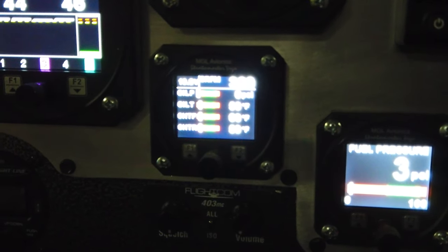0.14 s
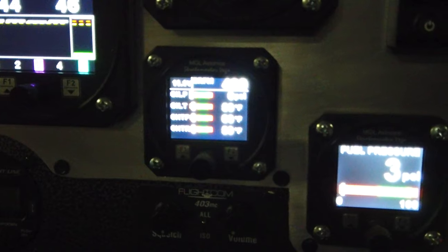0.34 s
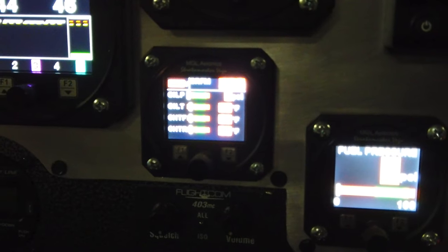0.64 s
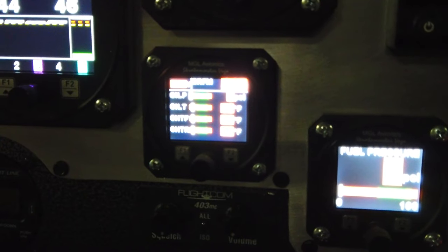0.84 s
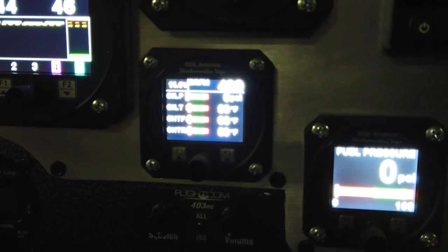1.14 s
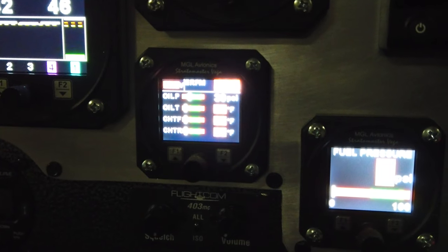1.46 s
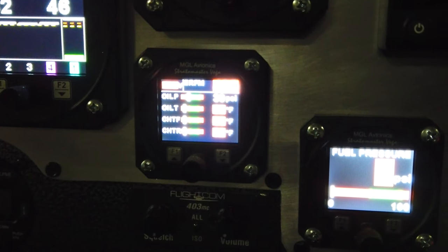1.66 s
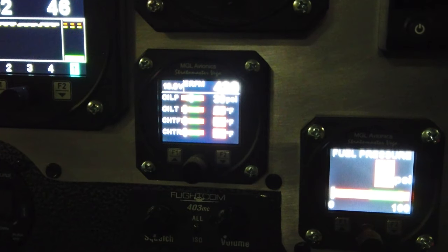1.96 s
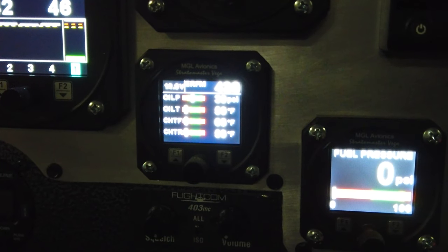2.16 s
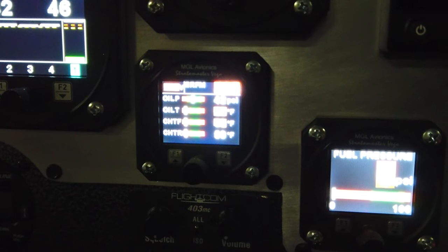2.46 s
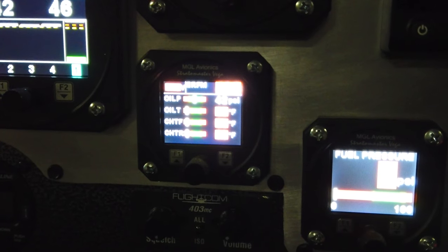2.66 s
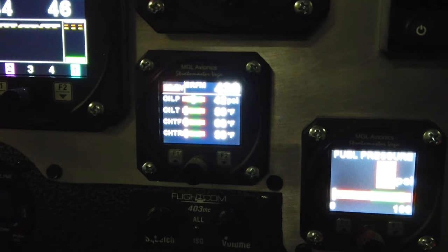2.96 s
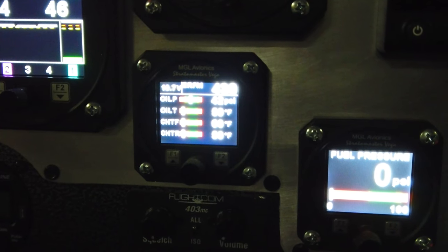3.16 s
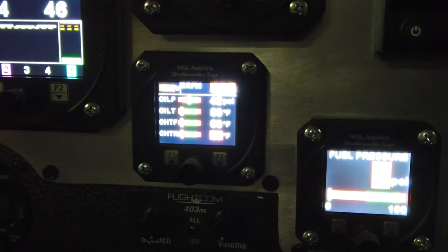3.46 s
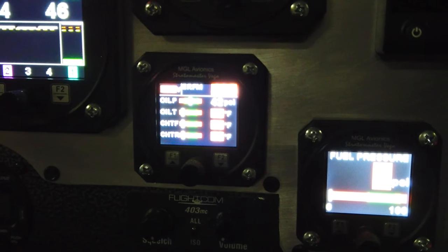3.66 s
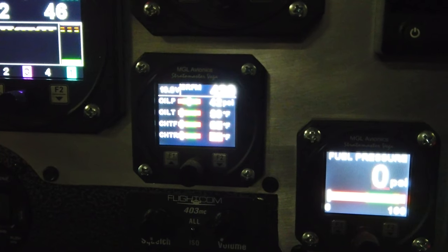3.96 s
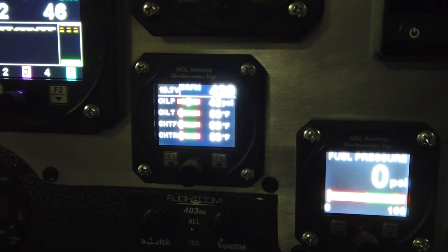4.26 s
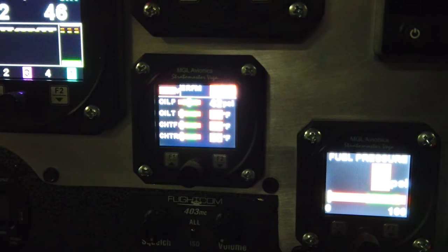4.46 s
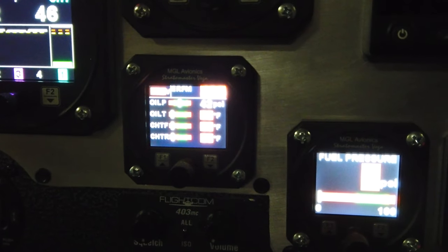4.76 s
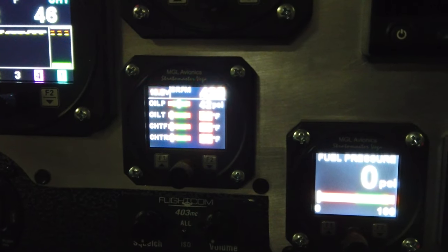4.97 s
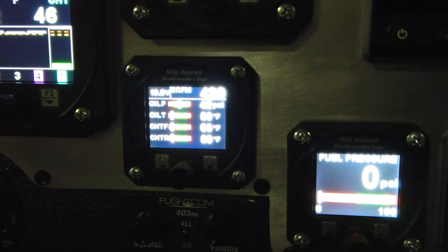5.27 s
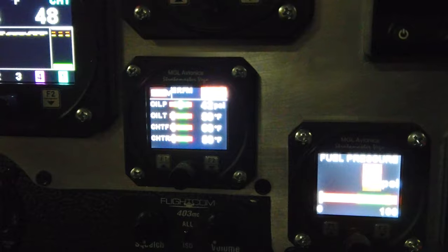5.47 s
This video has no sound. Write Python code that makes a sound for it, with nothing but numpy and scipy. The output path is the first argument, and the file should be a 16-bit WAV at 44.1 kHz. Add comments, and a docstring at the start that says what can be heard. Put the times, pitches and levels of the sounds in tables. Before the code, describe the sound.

Inside a plane's cockpit in a hangar, a starter engages with a brief scrape and cranks a piston engine that never fires. Low, even thumps come about fourteen times a second, and a high gear whine dips with each one. The gears churn, hiss and rattle over a low rumble, with occasional harder clacks. A switch clicks near the end. The sound is close, with a slight echo.

```python
"""In a plane's cockpit inside a hangar, the starter turns a piston engine that does not fire.
About 14 times a second a piston squeezes its air. Each of these strokes thumps the cabin and
slows the starter, so the whine of its gear teeth swoops. The gears scrape as they meet, then
churn, rattle and hiss under the load, over a low rumble. A switch clicks near the end."""
import sys
import numpy as np
from scipy import signal
from scipy.fft import rfft, irfft
from scipy.io import wavfile

SR = 44100
rng = np.random.default_rng(int(sys.argv[2]) if len(sys.argv) > 2 else 0)


def store_pcm(level_fs):
    """Save levels as 16-bit WAV."""
    pcm = np.round(np.clip(level_fs, -1, 1) * 32767).astype(np.int16)
    wavfile.write(sys.argv[1], SR, np.atleast_2d(pcm).T)


N = 247442
TIME, FREQ = np.arange(N) / SR, np.fft.rfftfreq(N, 1 / SR)

# The thump's tones. Each row: multiple of the stroke rate, level in dB at first, level once settled.
THUMP_TONES = [(1, -56, -56), (2, -17, -21), (3, -23, -24), (4, -21.5, -41.5), (5, -22, -25),
               (6, -37, -26.5), (7, -59, -43.5), (8, -38, -56), (9, -78, -68), (10, -55, -45),
               (11, -44, -57), (12, -47, -42.5), (13, -46, -52.5)]
# The four cylinders differ a little. Each row: change in dB of the thump, then of whine and churn.
CYLINDERS = [(-.1, .2), (-.8, .1), (.2, -.4), (.6, .2)]
# One stroke. Each row: place from 0 to 1, starter speed factor, change in dB of whine, churn and hiss.
STROKE_SHAPE = [(0, 1.055, -2, -.8, -1.4), (.12, 1.062, .8, .2, .4), (.27, 1.056, 0, .3, .7),
                (.38, 1.036, 1.2, -.5, .5), (.49, .988, 2.6, -.5, 1), (.58, .958, 3.3, .3, 0),
                (.7, .94, -2.8, .1, -.5), (.8, .88, -5.5, -.3, -.6), (.88, .9, -7.5, -1.2, -1),
                (.94, 1.035, -5, -1.5, -1.4)]
# The whine's tones, at 1, 2, 3.. times the tooth rate. Each row: level in dB, wobble in cycles.
WHINE_TONES = [(-34, 0.083), (-47.5, .08), (-52.5, 0.048), (-47.5, 0.072), (-47, 0.074), (-49.5, 0.088),
               (-61, 0.12)]
# The motor shaft's tones. Each row: fraction of the tooth rate, level in dB.
SHAFT_TONES = [(1 / 3, -55), (1 / 2, -50), (2 / 3, -45.5), (3 / 4, -53.5)]
# The colours of three noises. Each row: frequency in Hz, relative level in dB.
CHURN_COLOUR = [(60, -0.5), (140, -9.5), (250, -1), (305, -4.5), (450, -4), (750, -6), (860, -2),
                (930, -3.5), (1080, -0.5), (1200, -2), (1400, -2.5), (1720, 0.5), (1900, -4), (2550, -4),
                (2800, -7), (3200, -2.5), (3700, -11), (6000, -22.5)]
HISS_COLOUR = [(2000, -29), (3550, -0.5), (3750, -1), (4400, -7.5), (4680, -6.5), (4830, -3.5),
               (5030, -3.5), (5200, -5.5), (5500, -4), (6050, 4.5), (6600, 2), (6800, 1), (7450, 1),
               (8200, -0.5), (8700, -1), (9350, -2.5), (9950, -1.5), (10300, -2.5), (10700, -2.5),
               (11200, -8.5), (12400, -12), (13500, -9), (14150, -11.5), (14800, -12.5), (16000, -11.5)]
RUMBLE_COLOUR = [(8, -34), (16, -26), (24, -15), (45, -12), (62, -6), (75, -1.5), (86, -6), (100, -7.5),
                 (130, -19), (200, -23.5), (400, -52)]
# Where loose gears slap. Each row: place and scatter as shares of a stroke, clack in dB, tick in dB.
GEAR_SLAPS = [(.02, 0.015, -36.5, -59), (.16, .03, -35.5, -42), (.37, 0.025, -49, -34),
              (.585, .01, -38, -35.5), (.74, .04, -36, -52)]
# The hardest clacks. Each row: start in seconds, relative level in dB.
HARD_CLACKS = [(0.69, -18), (1.143, -28.5), (1.349, -28), (2.671, -32), (2.718, -22), (3.482, -17.5),
               (3.694, -23), (3.979, -19), (4.088, -15.5), (5.322, -28), (5.465, -20)]
# How the gear housing rings after a clack. Each row: pitch in Hz, width in Hz, relative level in dB.
HOUSING_BANDS = [(784, 120, -2.5), (1068, 137, 2.5), (1020, 970, -3)]
# The switch's snap. Each row: pitch in Hz, width in Hz, level in dB, seconds to fade by 60 dB.
SWITCH_BANDS = [(2250, 700, -29, .12), (10200, 1400, -24.5, 0.074), (12500, 1600, -29, 0.081)]
# How the cabin, engine cover and gear housing ring. Each row: pitch in Hz, width in Hz, boost in dB.
PANEL_RINGS = [(165, 30, 4.5), (240, 15, 4), (270, 15, 5), (339, 18, 7), (372, 18, 5), (430, 14, 5),
               (569, 25, 10), (684, 18, 8), (794, 24, 8), (860, 50, 3), (1043, 40, 7), (1326, 24, 7),
               (1499, 26, 6), (1545, 25, 1.5), (1615, 40, 3), (1664, 20, 4), (1695, 20, 6), (2095, 28, 6.5),
               (2180, 18, 6), (2440, 40, 4), (2560, 30, 4), (3020, 110, 4), (3260, 100, 5), (4910, 200, 7),
               (6280, 150, 3), (6635, 50, 7), (7480, 200, 4), (8250, 150, 2), (9650, 250, 3), (9930, 80, 3),
               (14180, 150, 4)]
# The echo of the cabin, then the hangar. Each row: seconds to fade by 60 dB, level in dB.
ECHOES = [(.22, -2), (.8, -9)]
# Stereo width. Each row: frequency in Hz, level in dB of what the ears hear apart against together.
STEREO_WIDTH = [(60, -54), (130, -69), (200, -25), (380, -18.5), (700, -17.5), (1200, -9.5), (1520, -6),
                (1690, -3.5), (2380, -3.5), (3500, 2), (4300, -1), (6050, 3), (7100, -3.5), (8800, -3.5),
                (10000, 0.5), (15000, -3)]

SPIN_UP_S, LOAD_S = .25, 1.13  # how slowly the starter gains speed and the load comes on


def crank(steady_hz=14.151, lacking_hz=3.774, extra_hz=1.189):
    """Counts the strokes so far: the starter spins up, runs a little fast and settles."""
    stroke_hz = steady_hz - lacking_hz * fading(SPIN_UP_S) + extra_hz * fading(1)
    return .504 + np.cumsum(stroke_hz) / SR  # begins halfway through a stroke


def thump(strokes, cylinder_db, cabin_hz=79, settle_s=5.1, lag_strokes=.026):
    """Each stroke pushes the cabin air; tones above the air's own pitch come out upside down."""
    propeller = np.cos(2 * np.pi * (strokes - 3) / 4.86)  # one turn every 4.86 strokes
    level_db = 2 - 10 * fading(.53) - .46 * propeller
    settled = np.minimum(TIME / settle_s, 1)
    stroke_hz = np.ptp(strokes) / TIME[-1]
    out = np.zeros(N)
    for k, (_, first_db, late_db) in enumerate(THUMP_TONES, 1):
        wave = np.cos(2 * np.pi * k * (strokes - lag_strokes * settled))
        out += amp(first_db + (late_db - first_db) * settled) * np.sign(cabin_hz - k * stroke_hz) * wave
    return out * amp(level_db + cylinder_db)


def starter_speed(stroke_speed, bite):
    """Each squeeze slows the starter, less as the engine loosens; the gears' first bite slows it too."""
    depth = 1 + .25 * fading(1.8) + .07 * wander(19.84)
    dip = (stroke_speed.max() - stroke_speed) * depth
    return (stroke_speed.max() - dip) * (1 - .11 * bite)


def whine(strokes, speed, teeth_per_stroke=110.5):
    """Chattering gear teeth sing lower and duller on each squeeze; the shaft's tones come and go."""
    looseness = 1 + .006 * wander(35)
    tooth_hz = teeth_per_stroke * np.gradient(strokes) * SR * speed * looseness
    teeth = np.cumsum(tooth_hz) / SR
    sag = tooth_hz / tooth_hz.max() - 1
    out = np.zeros(N)
    for k, (db, wobble) in enumerate(WHINE_TONES, 1):
        flutter = 1 + .4 * wander(150) + .1 * wander(40)
        cycles = k * teeth + wobble * wander(170) + rng.random()
        dulling = amp(5 * (k - 4.5) * sag)
        out += amp(db) * evened(flutter * dulling * np.cos(2 * np.pi * cycles))
    for fraction, db in SHAFT_TONES:
        flutter = 1 + .45 * wander(130) + .45 * wander(12)
        out += amp(db) * evened(flutter * np.cos(2 * np.pi * (fraction * teeth + rng.random())))
    return out


def ring_gear():
    """The engine's big gear sings on at its own steady pitch under the swoops."""
    return band(hz=1669, width_hz=120) * amp(-45.5 - 4 * fading(LOAD_S)) * (1 - fading(SPIN_UP_S))


def churn(change_db):
    """The gears grind with a rough noise that grows as the load comes on."""
    level_db = -32 - 2.5 * fading(LOAD_S) + change_db
    return noise(amp(curve(CHURN_COLOUR))) * amp(level_db + .43 * wander(200))


def hiss(change_db):
    """The gears give a flickering hiss that grows with load and speed."""
    level_db = -36 - 2.5 * fading(LOAD_S) - 4 * fading(SPIN_UP_S) + change_db
    return noise(amp(curve(HISS_COLOUR))) * amp(level_db + wander(600) + .52 * wander(9.9))


def rattle(strokes):
    """Loose teeth slap together with dull clacks and bright ticks, louder as the load comes on."""
    clacks, ticks = np.zeros((2, N))
    for place, scatter, clack_db, tick_db in GEAR_SLAPS:
        blows = pulses(strokes, place, scatter, scatter_db=1.5)
        clacks += amp(clack_db) * blows
        ticks += amp(tick_db) * blows
    for start_s, db in HARD_CLACKS:
        clacks[round(start_s * SR)] += amp(db - 9.5)
    housing = evened(sum(amp(db) * band(hz, width) for hz, width, db in HOUSING_BANDS))
    dull = dying(clacks, fade_s=.044) * housing
    bright = dying(ticks, fade_s=.027) * band(hz=2600, width_hz=1450)
    return (dull + bright) * amp(-7 * fading(LOAD_S))


def hoots(strokes, rise_s=.00983):
    """A short hoot near 560 Hz swells once a stroke, varying in strength."""
    starts = pulses(strokes, place=.0834, scatter=0, scatter_db=3)
    hoot = short_tone(peak_s=rise_s, db=-37, hz=559, rise_s=rise_s)[:N // 32]
    return signal.oaconvolve(starts, hoot)[:N]


def scrape(from_hz=2150, to_hz=2955, width_hz=180):
    """The starter's small gear rasps on the big one, rising and fading as it slides into place."""
    gap = fading(.14)
    cycles = np.cumsum(to_hz + (from_hz - to_hz) * gap) / SR
    rasp = noise(1 / (1 + (FREQ / width_hz) ** 4)) * np.cos(2 * np.pi * cycles)
    return amp(-36.5) * gap * evened(rasp)


def switch(start_s=5.538, rise_s=.0003):
    """A switch snaps, with a dull knock from the instrument panel."""
    age = np.maximum(TIME - start_s, 0)
    attack = 1 - np.exp(-age / rise_s)
    snap = sum(amp(db - 60 * age / fade_s) * noise(1 / (1 + (2 * (FREQ - hz) / width) ** 2))
               for hz, width, db, fade_s in SWITCH_BANDS)
    return attack * snap + short_tone(peak_s=start_s + .002, db=-23.5, hz=295, rise_s=.006)


def rumble():
    """A low rumble, stronger at first as the engine rocks on its mounts."""
    return noise(amp(curve(RUMBLE_COLOUR))) * amp(-31 + 2.8 * fading(.31))


def panels(sound):
    """The panels round the engine and cabin boost the pitches at which they ring."""
    boosts = [1 + (amp(db) - 1) / (1 + 2j * (FREQ - hz) / width) for hz, width, db in PANEL_RINGS]
    ringing = irfft(np.prod(boosts, axis=0), N)[:N // 32]
    return signal.oaconvolve(sound, ringing[None], axes=1)[:, :N]


def echoes(sound, wall_hz=2600):
    """Low tones pass through the wall behind the engine; high ones arrive as cabin and hangar echoes."""
    tails = [(rng.standard_normal((2, N)) * amp(-60 * TIME / fade_s), db) for fade_s, db in ECHOES]
    room = spread(sum(amp(db) * tail / np.linalg.norm(tail[0]) for tail, db in tails))
    direct = signal.lfilter(*signal.butter(1, wall_hz, fs=SR), sound)
    return direct + signal.fftconvolve((sound - direct)[None], room[:, :N // 2], axes=1)[:, :N]


def pulses(strokes, place, scatter, scatter_db):
    """One pulse of random strength near the same place in every stroke."""
    late, strength = np.clip(rng.standard_normal((int(strokes[-1]) + 1, 2)), -2, 2).T
    at = np.searchsorted(strokes, np.arange(len(late)) + place + scatter * late)
    inside = (at > 0) & (at < N)
    return np.bincount(at[inside], amp(scatter_db * strength[inside]), N)


def dying(blows, fade_s, rise_s=.00071):
    """Each blow swells quickly, then drops by 60 dB in fade_s."""
    age = np.arange(N // 32) / SR
    return signal.oaconvolve(blows, (1 - np.exp(-age / rise_s)) * amp(-60 * age / fade_s))[:N]


def short_tone(peak_s, db, hz, rise_s):
    """A tone swells to its peak and soon dies away."""
    age = np.clip(1 + (TIME - peak_s) / rise_s, 0, 20)
    return amp(db) * age * np.exp(1 - age) * np.sin(2 * np.pi * hz * (TIME - peak_s))


def band(hz, width_hz):
    """Stereo noise close to one pitch."""
    return noise(1 / (1 + (2 * (FREQ - hz) / width_hz) ** 4))


def noise(gain):
    """Stereo noise of strength 1, coloured by a gain for each frequency."""
    return evened(spread(irfft(rfft(rng.standard_normal((2, N))) * gain, N)))


def spread(pair):
    """Two unrelated signals become left and right: alike in the bass, apart in the treble."""
    mid, side = rfft(pair)
    width = amp(curve(STEREO_WIDTH))
    return irfft(np.array([mid + width * side, mid - width * side]) / np.sqrt(1 + width ** 2), N)


def wander(rate_hz):
    """A smooth random wobble of strength 1, up to about this rate."""
    return evened(irfft(rfft(rng.standard_normal(N)) / (1 + (FREQ / rate_hz) ** 4), N))


def curve(points):
    """Joins a table's points into a level in dB for every frequency."""
    hz, db = np.transpose(points)
    return np.interp(np.log(FREQ + 1), np.log(hz + 1), db)


def fading(seconds):
    """Falls from 1 towards 0, reaching about a third after this time."""
    return np.exp(-TIME / seconds)


def amp(db):
    """Turns decibels into a gain."""
    return 10 ** (np.asarray(db) / 20)


def evened(x):
    """Scales a signal to an average strength (rms) of 1."""
    return x / np.sqrt(np.mean(x ** 2) + 1e-20)


def scene():
    """The count of strokes keeps the thump, the whine and the gear noises in step."""
    strokes = crank()
    places, *columns = np.transpose(STROKE_SHAPE)
    speed, whine_db, churn_db, hiss_db = (np.interp(strokes, places, c, period=1) for c in columns)
    cylinder_db, load_db = (np.interp(strokes, np.arange(len(c)), c, period=len(c))
                            for c in np.transpose(CYLINDERS))
    bite = np.exp(-(TIME / .024) ** 4)
    strain_db = .5 - 4 * fading(LOAD_S) + 1.5 * fading(SPIN_UP_S) + 1.5 * bite
    starter = whine(strokes, starter_speed(speed, bite)) * amp(whine_db + load_db + strain_db)
    gears = echoes(starter) + ring_gear() + churn(churn_db + load_db - 1.5 * bite) + hiss(hiss_db)
    background = rumble()
    gears += rattle(strokes) + scrape()
    return thump(strokes, cylinder_db) + panels(gears) + hoots(strokes) + switch() + background


def record(dry, top_hz=15780):
    """Cuts away the very highest treble."""
    low_pass = signal.firwin(1023, top_hz, window=("kaiser", 9), fs=SR)
    return signal.oaconvolve(dry, low_pass[None], "same")


dry = scene()
out = record(dry)
store_pcm(out)
```